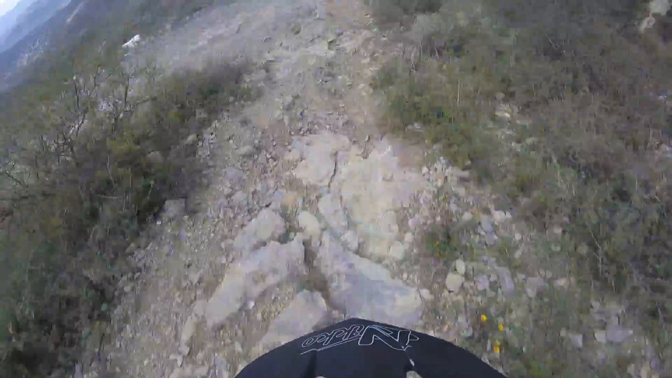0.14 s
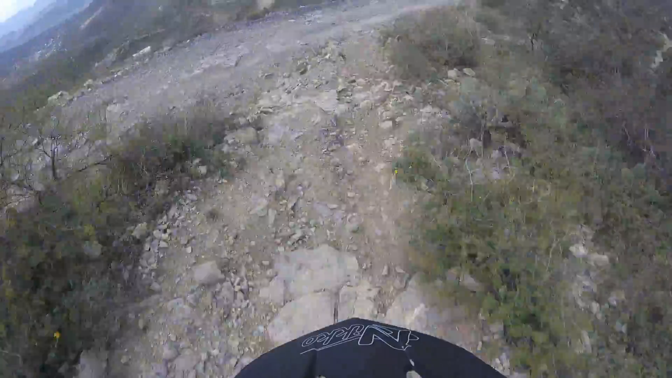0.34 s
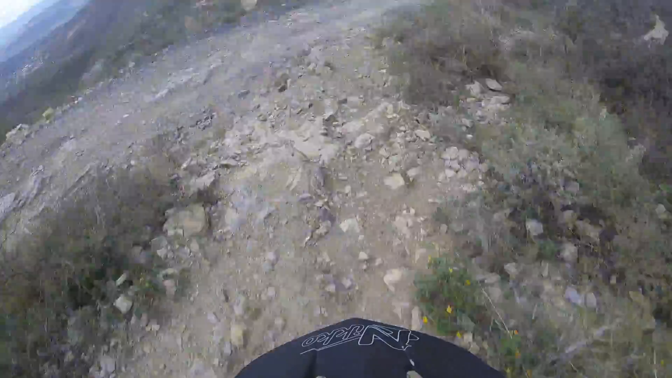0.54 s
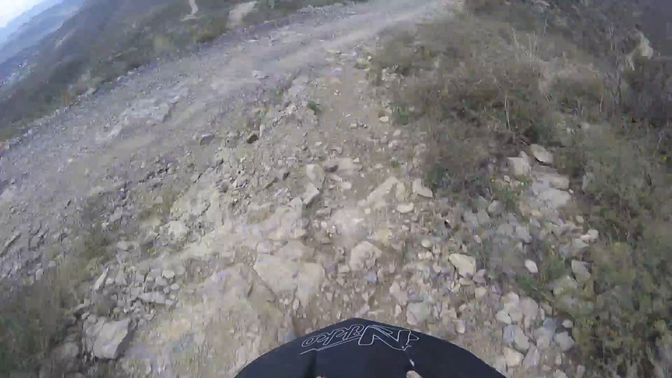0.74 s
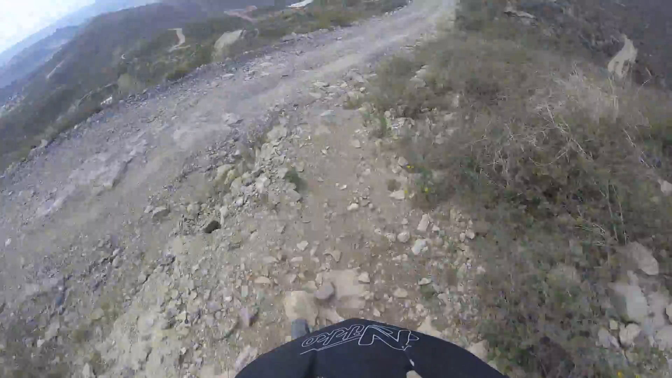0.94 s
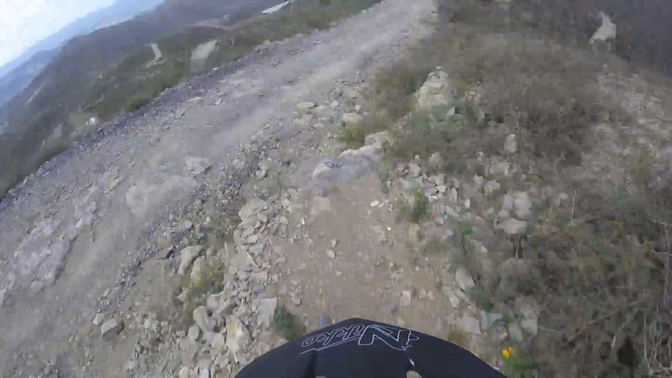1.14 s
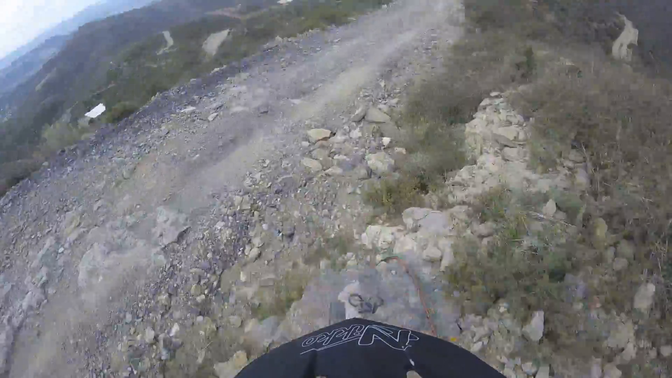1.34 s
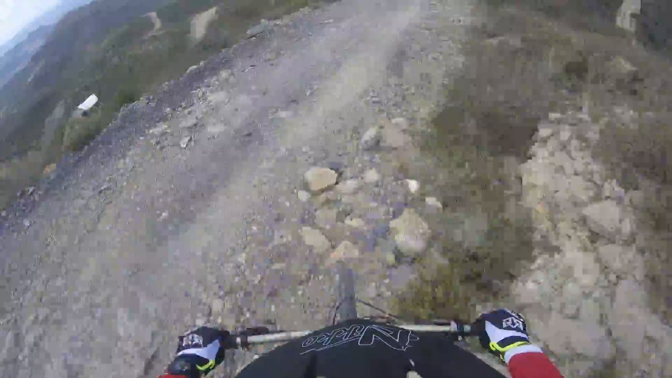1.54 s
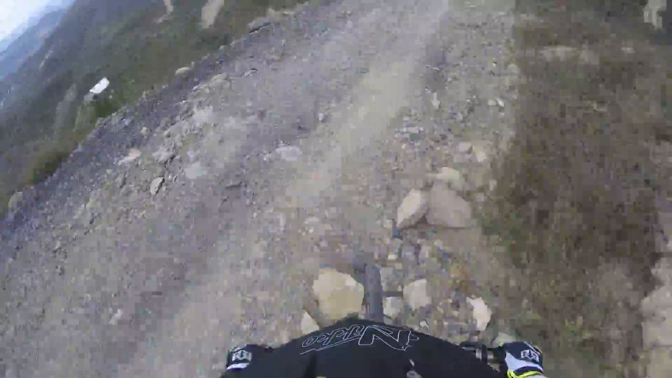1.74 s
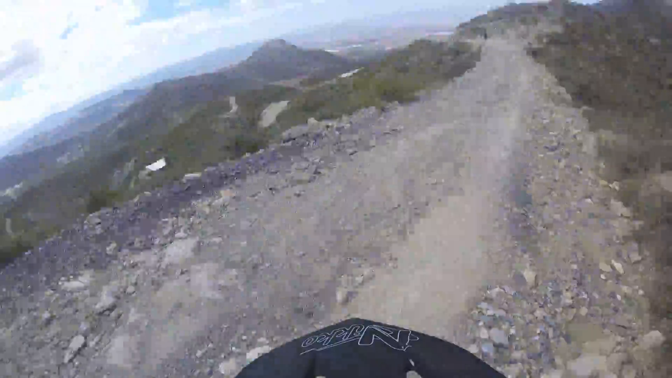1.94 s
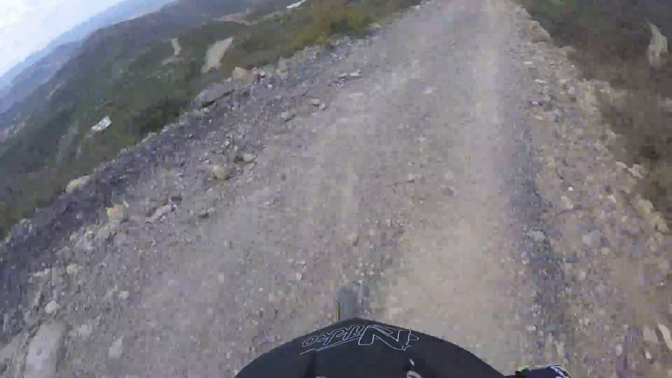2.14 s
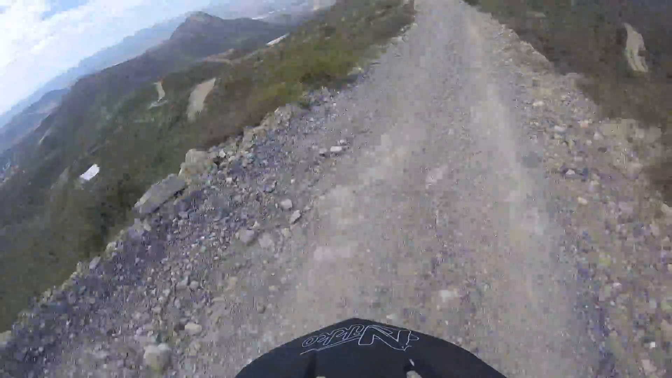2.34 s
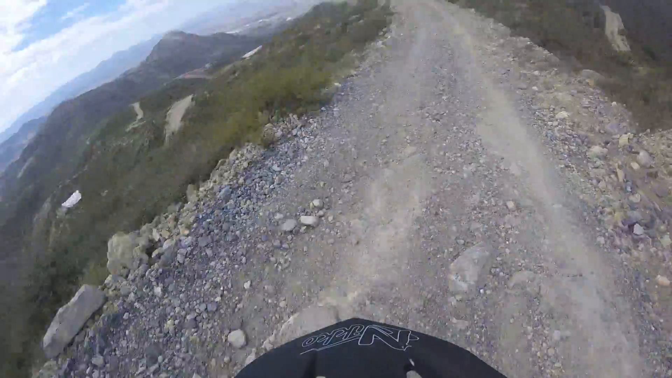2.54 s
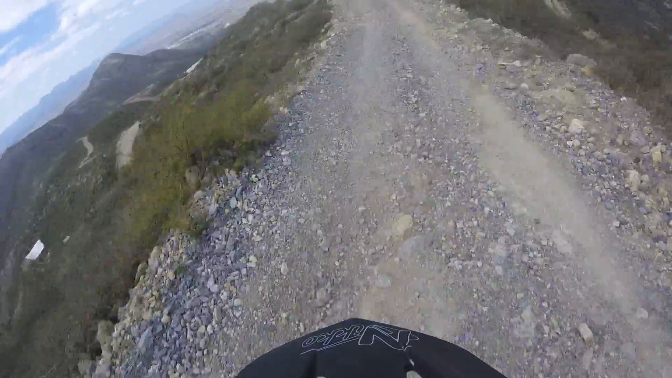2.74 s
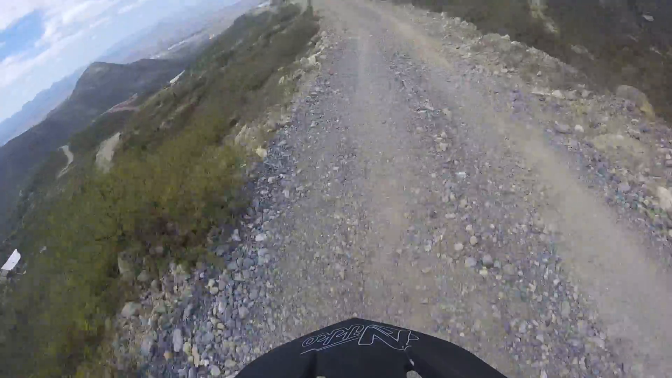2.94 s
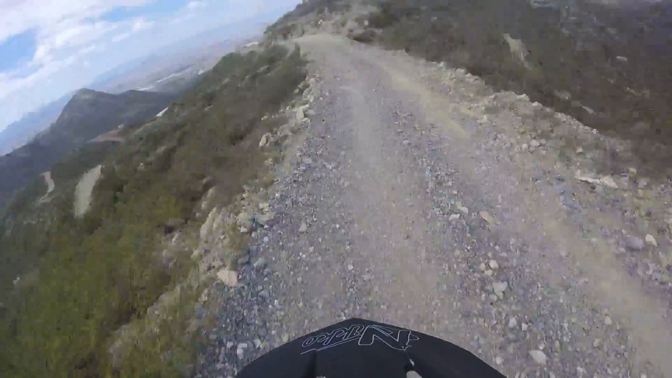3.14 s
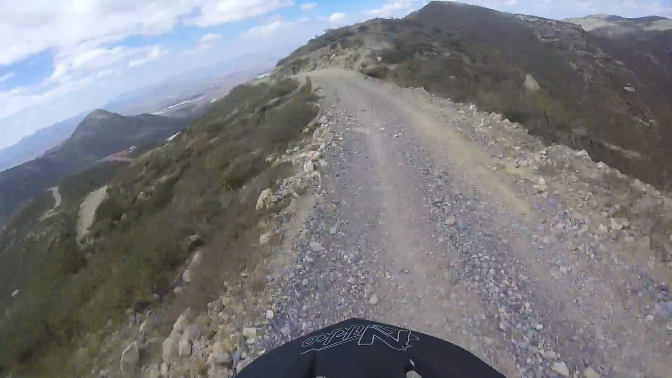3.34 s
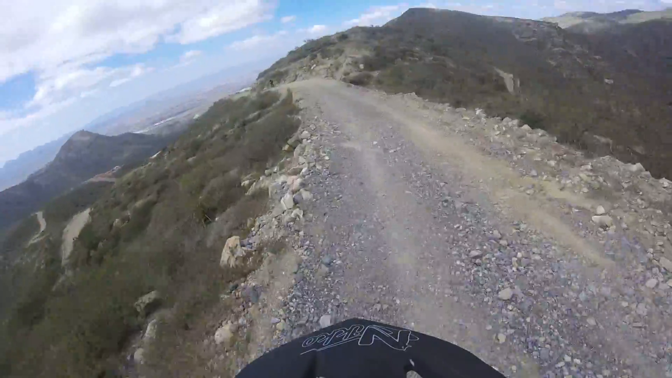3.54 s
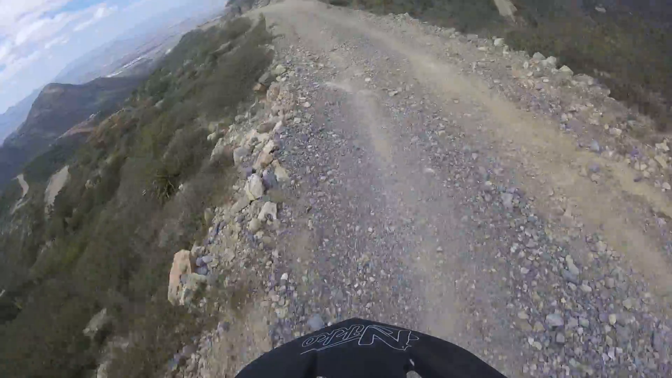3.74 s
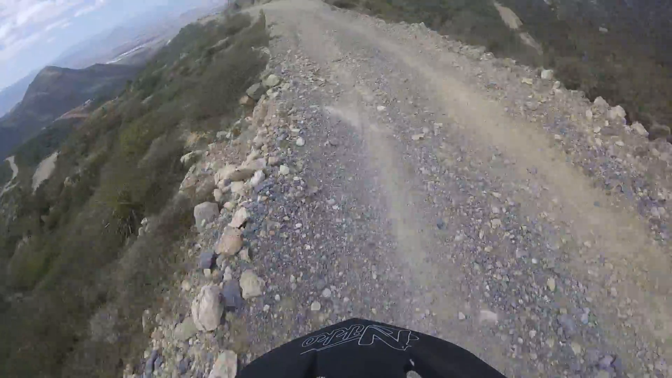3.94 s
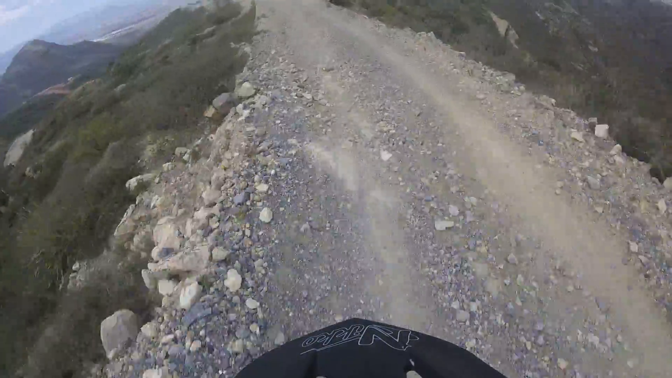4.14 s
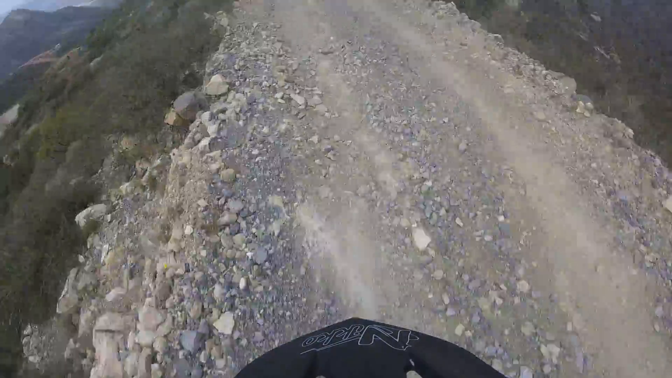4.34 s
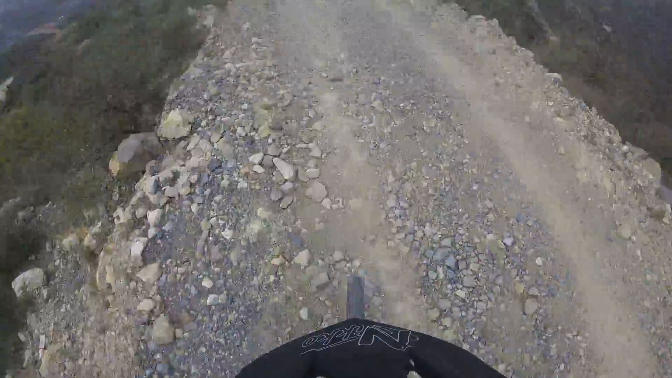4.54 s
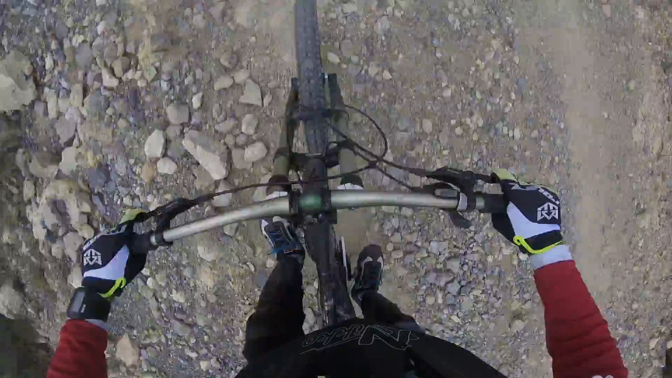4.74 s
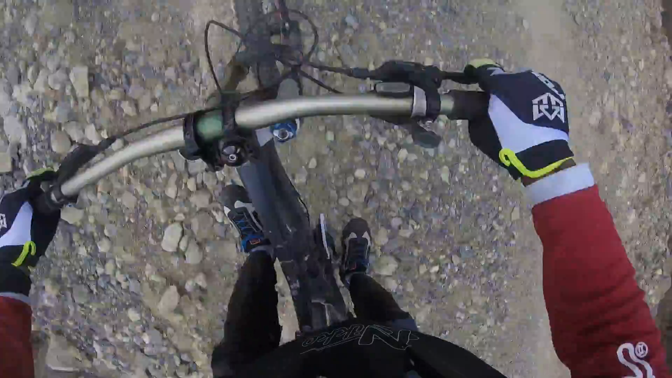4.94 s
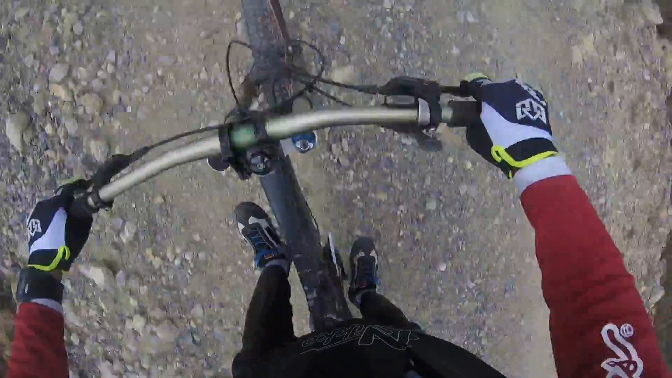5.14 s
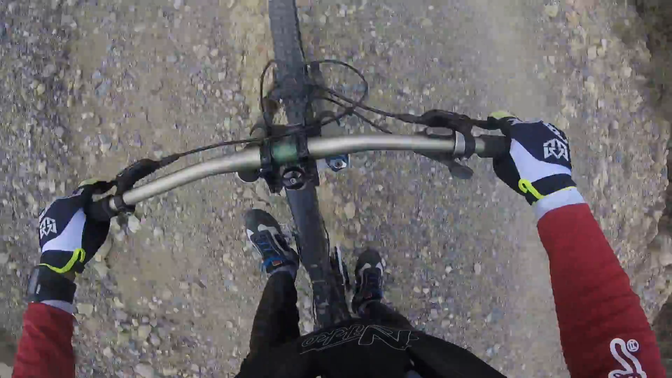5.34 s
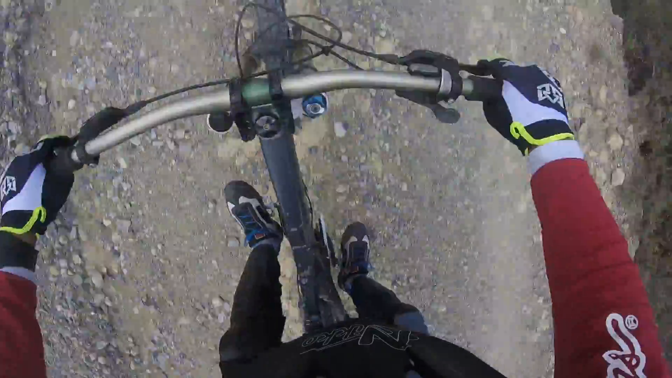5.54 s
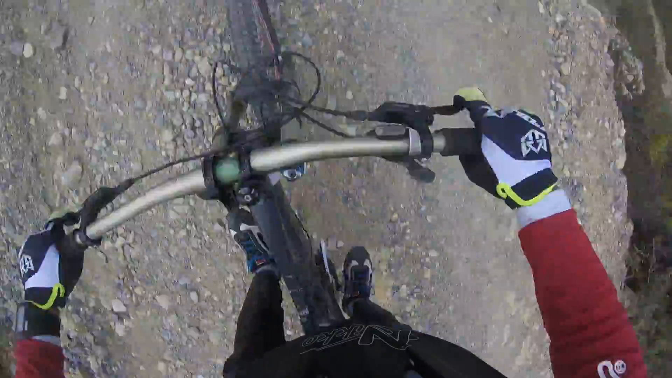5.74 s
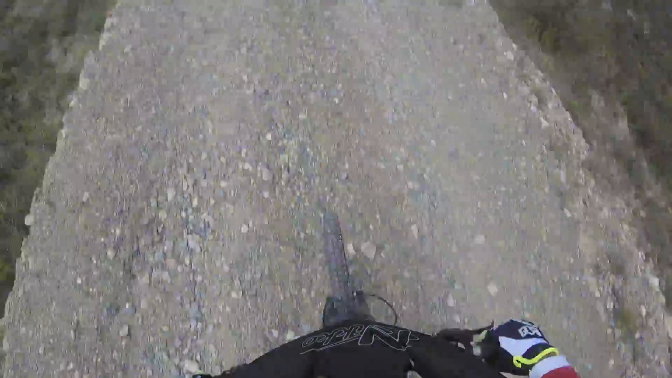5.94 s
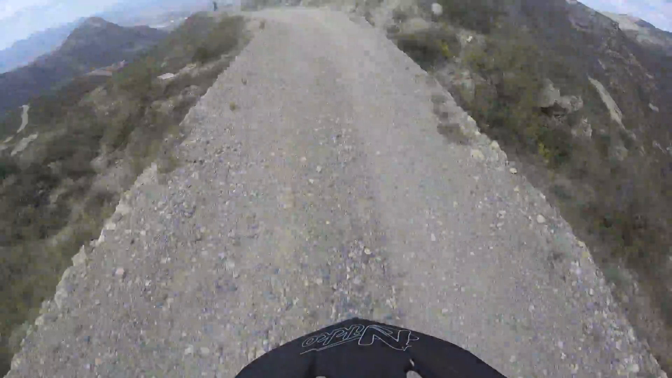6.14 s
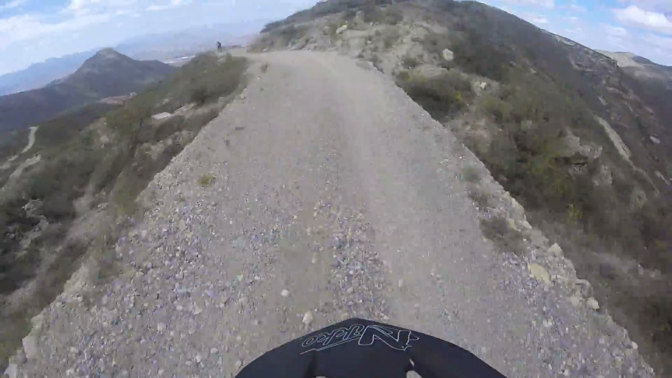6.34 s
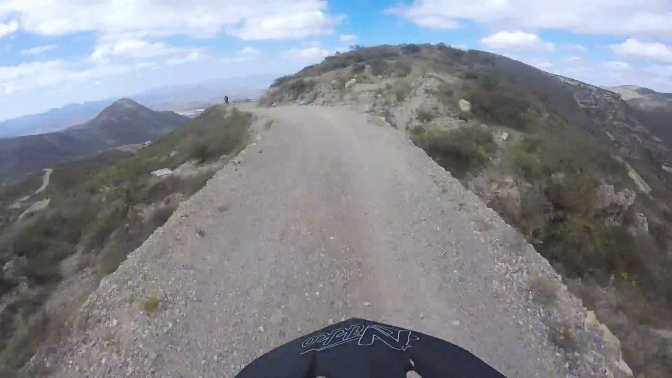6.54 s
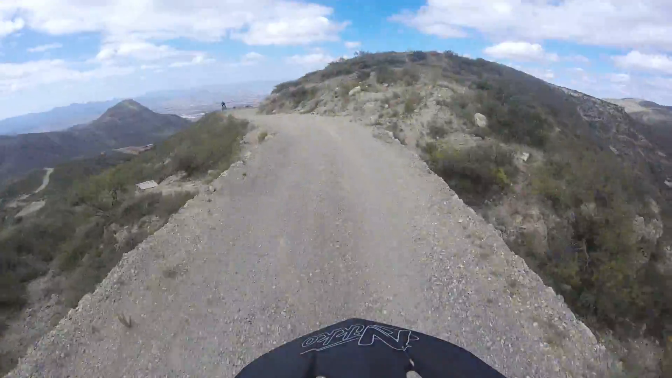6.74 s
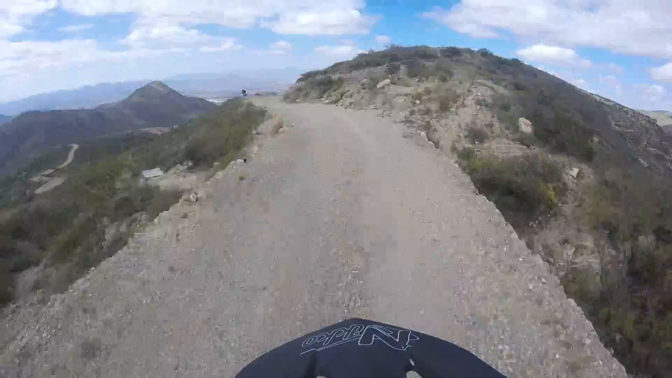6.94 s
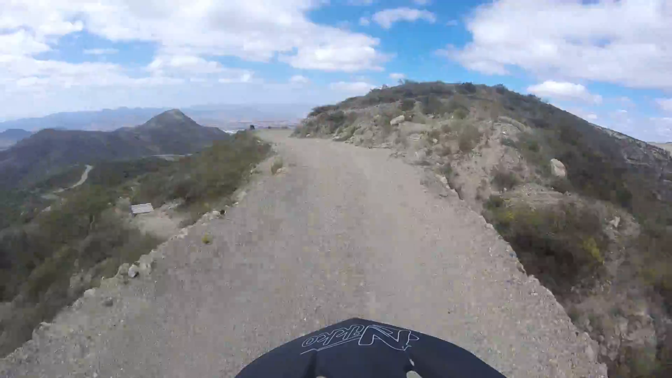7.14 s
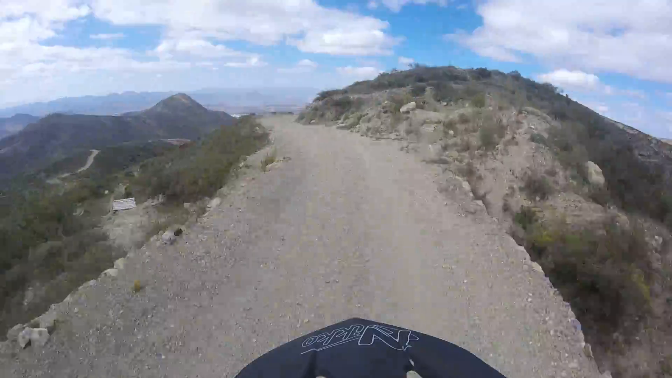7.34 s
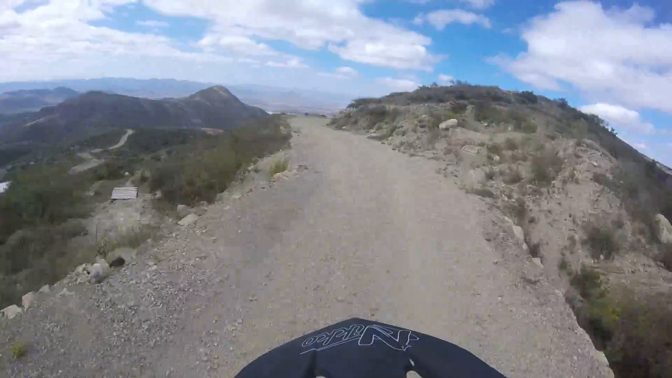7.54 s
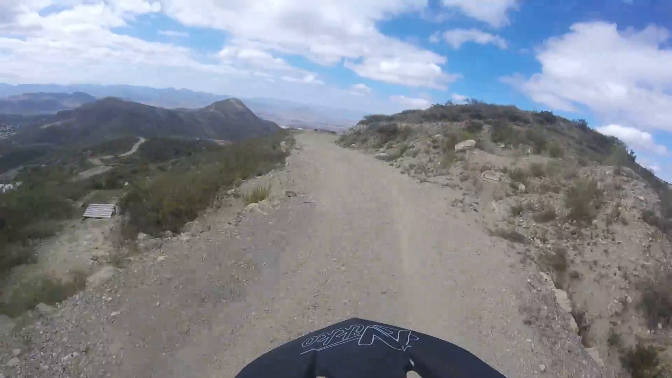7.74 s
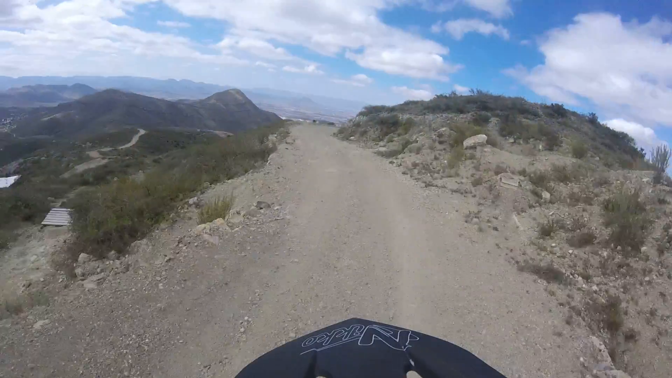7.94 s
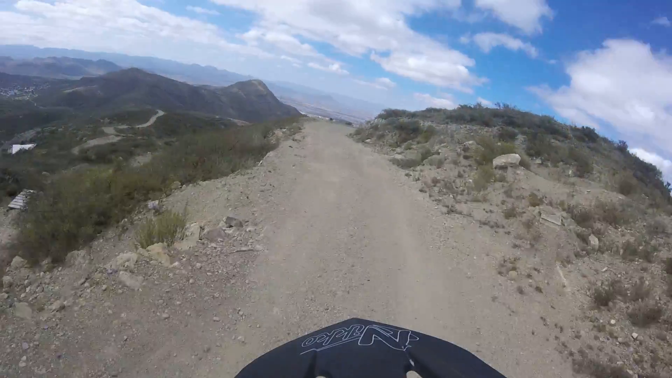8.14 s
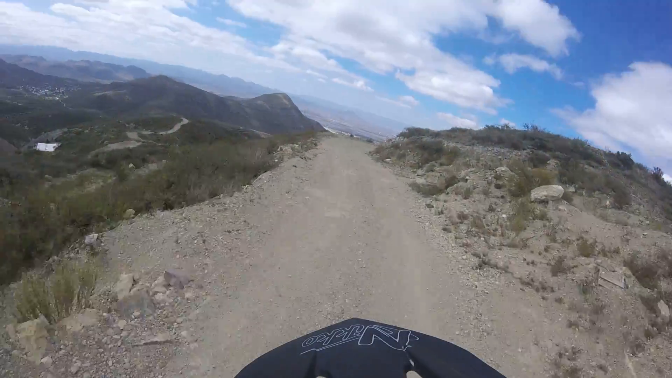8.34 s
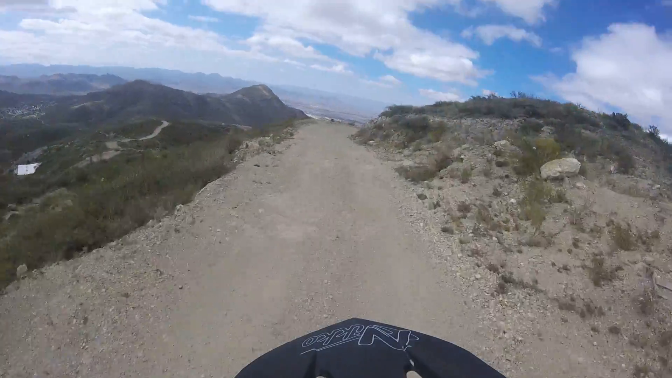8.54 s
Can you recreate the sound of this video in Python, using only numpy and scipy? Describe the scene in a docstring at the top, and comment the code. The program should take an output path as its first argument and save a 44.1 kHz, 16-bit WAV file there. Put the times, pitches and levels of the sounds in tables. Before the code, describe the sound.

A bicycle rolls down a gravel trail, tyres crunching and stones ticking, while wind buffets and thumps a muffled helmet-mounted microphone.

```python
"""Low wind buffeting and a mount hum near 100 Hz set in at once, with gravel crunching under bicycle tyres.
A mountain bike rolls down a gravel trail, heard by a small camera in a closed housing on the rider's helmet.
Buffeting, hum and air rush are filtered noise; jolts are slow pressure swings pushing the membrane;
loose parts knock and stones tick as noise bursts through resonances; dense random cracks make the crunch."""
import sys
import numpy as np
from scipy import signal
from scipy.fft import rfft, irfft, next_fast_len
from scipy.io import wavfile

SR = 44100
rng = np.random.default_rng(int(sys.argv[2]) if len(sys.argv) > 2 else 0)


def dump_mix(stems):
    """Bounce the given channels to the path in sys.argv[1] as a 16-bit WAV at rate SR."""
    frames = np.atleast_2d(stems).T  # one column per channel
    limited = np.clip(frames, -1, 1)  # hard clip at full scale
    pcm = np.round(limited * 32767).astype(np.int16)
    wavfile.write(sys.argv[1], SR, pcm)


N = 379701

# wind and mount, shaking at the helmet: [t/s, buffeting level/dB, hum level/dB]
AIR_LEVELS = [(0, -31, -37.5), (.5, -30, -45), (.9, -35, -39.5), (1.43, -33.5, -42), (1.9, -43.5, -41),
              (2.2, -24.5, -32.5), (2.4, -35, -44.5), (2.62, -39.5, -37.5), (3.24, -36.5, -43),
              (3.7, -41.5, -43), (4.2, -39.5, -40.5), (4.7, -42, -41), (5.2, -33, -41.5),
              (5.46, -40.5, -44), (6.2, -41.5, -45), (6.7, -38.5, -44), (7.4, -42, -48), (8.61, -43, -49)]
# wind buffeting spectrum: [f/Hz, level/dB]
BUFFET_SPECTRUM = [(8, 1), (20, 2.5), (35, 3.5), (60, -15.5), (100, -10.5), (200, -56.5), (1000, -120)]
# air rush spectrum: [f/Hz, level/dB]
RUSH_SPECTRUM = [(120, -8), (200, 0), (300, -3), (450, -10), (800, -12.5), (1200, -11.5), (3000, -15),
                 (6000, -44), (15000, -51)]
# helmet mount resonances: [f/Hz, width/Hz, level/dB]
MOUNT_MODES = [(96.8, 25.5, 1.5), (141.6, 25.5, -8.5), (231.3, 35, -14.5)]
# bumps of the chin bar: [t/s, level/dB]
MOUNT_BLOWS = [(0.186, -28), (2.619, -32), (4.726, -20.5)]
# broad part of a bump: [f/Hz, level/dB]
THUD_SPECTRUM = [(60, -35), (150, -23), (300, -23.5), (600, -49), (3000, -110)]
# head jolts that suck the membrane out: [t/s, level/dB, time scale/ms]
JOLTS = [(0.138, -16, 19), (0.177, -25, 6.8), (0.36, -15, 12.7), (0.488, -19.5, 33), (0.616, -18.5, 20),
         (0.727, -27, 9.1), (0.78, -7, 9), (0.881, -21.5, 27), (0.988, -13.5, 9.2), (1.042, -24, 7.9),
         (1.122, -19, 10.4), (1.195, -25.5, 13), (1.267, -16, 12), (1.45, -10, 11.8), (1.53, -23.5, 31),
         (1.748, -24.5, 54), (2.103, -7.5, 9.3), (2.186, -25, 31), (2.252, -20, 47), (2.558, -25.5, 14),
         (2.637, -21, 21), (3.151, -22, 27), (3.381, -25.5, 21), (3.965, -28.5, 22), (4.821, -18.5, 17),
         (4.991, -22.5, 52), (5.124, -24, 29), (5.233, -26, 18), (5.307, -19.5, 35), (5.691, -22.5, 34),
         (5.806, -23.5, 21), (6.768, -28, 14)]
# knocks of loose parts: [t/s, level/dB, f/Hz]
KNOCKS = [(0.089, -36, 2500), (0.2853, -39, 2670), (0.314, -37, 2570), (0.4492, -36.5, 2540),
          (0.5962, -32, 1500), (0.7597, -30, 2560), (1.0016, -32.5, 1930), (1.0989, -41, 1510),
          (1.422, -31.5, 3930), (2.7874, -35, 2720), (2.9, -31, 1520), (4.8234, -40, 1920),
          (4.889, -29, 2160), (4.9223, -31, 1630), (4.9503, -37, 2630), (4.9765, -36, 1600),
          (5.032, -34.5, 2510), (5.07, -36, 2070), (5.0998, -38, 1600), (5.1362, -36, 2900),
          (5.1632, -39, 2620), (5.2017, -36, 3730), (5.2427, -34, 2220), (5.2946, -37, 2600),
          (5.317, -31.5, 2500), (5.365, -38.5, 2130), (5.5174, -34, 2050), (5.5594, -36.5, 3820),
          (5.5992, -38.5, 2630), (5.6445, -35, 2770), (5.697, -36.5, 2240), (5.7578, -36.5, 2650),
          (5.7999, -32.5, 3600), (5.8069, -35.5, 2510), (5.846, -38, 2680), (5.92, -40, 2660)]
# stones against rim and frame: [t/s, level/dB]
TICKS = [(0.102, -51), (0.124, -55), (0.159, -43), (0.2204, -52), (0.321, -45.5), (0.4525, -39),
         (0.5933, -43), (0.7562, -46), (0.9048, -56), (0.951, -51), (1.002, -46.5), (1.1025, -51.5),
         (1.223, -51.5), (1.421, -43), (1.517, -52.5), (1.596, -46.5), (2.029, -46), (2.0757, -45),
         (2.1335, -37), (2.183, -43), (2.377, -55), (2.4109, -57), (2.4518, -58), (2.9073, -50),
         (3.7359, -49), (3.8407, -46), (4.301, -50), (4.4922, -49.5), (4.841, -59), (4.8838, -46),
         (4.8946, -46), (4.9086, -42.5), (4.9856, -42.5), (5.034, -48), (5.0693, -50), (5.107, -48),
         (5.125, -50), (5.1444, -49), (5.238, -50.5), (5.294, -55), (5.3118, -38), (5.36, -53),
         (5.387, -42.5), (5.447, -41.5), (5.524, -59), (5.698, -54), (5.748, -47), (5.8885, -54),
         (5.9304, -58), (6.7207, -47), (7.0589, -60)]
# resonances excited by ticks: [f/Hz, width/Hz, level/dB]
TICK_MODES = [(3600, 960, 11.5), (6205, 930, 7), (7750, 1900, 0.5), (8740, 380, -11), (11600, 710, -23),
              (13600, 1500, -30)]
# rocky stretches, small stones and parts chatter: [start t/s, end t/s, level/dB]
ROCKY_STRETCHES = [(0.0, 0.213, -60), (0.49, 1.65, -64), (2.0, 2.478, -62.5), (2.88, 3.22, -63),
                   (4.28, 4.36, -56), (4.71, 5.497, -62.5), (5.502, 6.05, -65)]
# chatter spectrum beside the tick modes: [f/Hz, level/dB]
CHATTER_SPECTRUM = [(2000, -24), (4500, 3), (7000, -11), (10000, -9), (15000, -34)]
# tyre crunch on gravel: [t/s, level/dB]
CRUNCH_LEVELS = [(0.0, -43), (0.08, -54), (0.16, -44), (0.25, -56.5), (0.46, -49.5), (0.58, -45),
                 (0.8, -42), (1.1, -44), (1.2, -51), (1.28, -46), (1.48, -43.5), (1.62, -51), (1.77, -39.5),
                 (1.94, -43), (2.08, -29.5), (2.17, -32.5), (2.28, -44), (2.48, -46.5), (2.63, -39),
                 (2.81, -50), (3.03, -38), (3.2, -45.5), (3.25, -51.5), (3.44, -41), (3.76, -33),
                 (3.85, -41.5), (3.89, -46.5), (4.0, -42), (4.24, -48), (4.33, -43.5), (4.42, -50.5),
                 (4.48, -59.5), (4.62, -50.5), (4.74, -52.5), (4.95, -48.5), (5.7, -56.5), (5.95, -54),
                 (6.24, -63.5), (6.4, -54.5), (6.6, -50.5), (6.72, -39), (7.03, -41.5), (7.18, -46),
                 (7.32, -43), (7.44, -48), (7.6, -43), (8.0, -47), (8.61, -45.5)]
# housing resonances, facing ahead: [f/Hz, width/Hz, level/dB]
HOUSING_AHEAD = [(1955, 340, 0), (2640, 390, 4), (2930, 490, -2.5), (3467, 1120, -4.5), (3560, 240, -7.5)]
# housing resonances, facing the front wheel: [f/Hz, width/Hz, level/dB]
HOUSING_DOWN = [(1690, 290, -6.5), (2070, 180, -3.5), (2600, 160, -1.5), (3000, 230, -14.5),
                (3703, 330, -5.5)]
# housing shut-off above its top resonance: [f/Hz, level/dB]
HOUSING_EDGE = [(3880, 0), (4150, -12)]
# transmission through the housing wall: [f/Hz, level/dB]
WALL_SPECTRUM = [(300, -21), (900, -24.5), (1700, -15), (2300, -5.5), (3900, -17.5), (4150, -25),
                 (4500, -27.5), (5200, -36.5), (7000, -45), (15000, -84)]
# helmet cavity resonances: [f/Hz, width/Hz, level/dB]
CAVITY_MODES = [(1425, 180, 5), (1552, 87, 3), (1216, 290, -20)]
# helmet cavity ring relative to the crunch: [t/s, level/dB]
CAVITY_LEVELS = [(0, 4), (.25, -1.5), (.55, -4), (1.3, 3.5), (1.63, -2), (1.8, 2), (2.2, -2.5), (3.1, 4.5),
                 (3.67, 0), (4.35, 5.5), (4.85, -4.5), (6.28, -2), (6.38, 6.5), (6.7, 3), (8.61, 1.5)]
# microphone port resonances, bright grit: [f/Hz, width/Hz, level/dB]
PORT_MODES = [(6176, 510, 8.5), (7440, 2300, -11.5)]

RUSH_DB, RUSH_PER_HUM, RUSH_PER_CRUNCH = -51.5, 0.38, 0.16  # level at mean hum and crunch; dB per dB of swing
SMOOTH_CHATTER_DB, ROCKY_EDGE_S = -72.5, 0.083
LOOK_DOWN_S, NOD_DOWN_S, LOOK_UP_S, NOD_UP_S = 4.4, 0.28, 5.95, 0.87  # head bows, for; lifts, for
GRIT_DB, GRIT_DOWN_DB = -21, 0  # relative to the crunch; change with the head bowed
OPEN_TOP_DB, OPEN_TOP_HZ = 10.5, 8500  # bowed head: boost of tick modes above this
LOWPASS_HZ = 14950
BURST_LEN = 2640  # samples, 60 ms

T_S = np.arange(N) / SR
SIZE = next_fast_len(N + SR // 2)
HZ = np.maximum(np.arange(SIZE // 2 + 1) * SR / SIZE, 1)


def amp(db):
    """dB to gain."""
    return 10 ** (np.asarray(db) / 20)


def rms_one(x):
    """Scale to rms 1."""
    return x / np.sqrt(np.mean(x ** 2) + 1e-20)


def in_time(rows):
    """Interpolate the columns of a time table at every sample."""
    s, *columns = np.transpose(rows)
    return [np.interp(T_S, s, column) for column in columns]


def slope(points):
    """Power response through (f/Hz, level/dB) points, linear in log f."""
    hz, db = np.transpose(points)
    return amp(np.interp(np.log(HZ), np.log(hz), db)) ** 2


def peaks(modes, order=2):
    """Power response of parallel resonances; higher order gives steeper skirts."""
    total = 0
    for hz, width_hz, db in modes:
        detuning = 2 * (HZ - hz) / width_hz
        total = total + amp(db) ** 2 / (1 + detuning ** 2) ** order
    return total


def colour(x, power):
    """Minimum-phase filter with this power response, by folding the cepstrum."""
    cepstrum = irfft(.5 * np.log(power + 1e-14), SIZE)
    cepstrum[1:SIZE // 2] *= 2
    cepstrum[SIZE // 2 + 1:] = 0
    response = np.exp(rfft(cepstrum))
    return irfft(rfft(x, SIZE) * response, SIZE)[:len(x)]


def drift(corner_hz):
    """Slow random curve, spread 1: noise through a double pole at 1/40 of the sample rate."""
    r = np.exp(-2 * np.pi * corner_hz * 40 / SR)
    noise = rng.standard_normal(N // 40 + 2002)
    slow = signal.lfilter([1], [1, -2 * r, r * r], noise)[2000:]  # drop the settling
    return np.interp(np.arange(N) / 40, np.arange(len(slow)), rms_one(slow))


def grains(per_s, uneven_db):
    """Random clicks of uneven size and either sign, rms 1."""
    size_db = uneven_db * np.minimum(rng.exponential(1, N), 5)
    sizes = amp(size_db) * rng.choice([-1, 1], N)
    return rms_one(sizes * (rng.random(N) < per_s / SR))


def burst(decay_ms, bounce_db, rise_ms):
    """Contact with bounces: noise in 2 ms clumps, fast rise, decay with a weak 18 ms tail, rms 1."""
    t_s = np.arange(BURST_LEN) / SR
    clumps = amp(bounce_db * np.repeat(rng.standard_normal(30), 88))
    rise = 1 - np.exp(-1000 * t_s / rise_ms)
    decay = np.exp(-1000 * t_s / decay_ms) + 0.16 * np.exp(-t_s / 0.018)
    return rms_one(rng.standard_normal(BURST_LEN) * clumps * rise * decay)


def looking_down():
    """Head position: 0 facing ahead, 1 facing the front wheel, linear between."""
    bowing = (T_S - LOOK_DOWN_S) / NOD_DOWN_S
    lifting = 1 - (T_S - LOOK_UP_S) / NOD_UP_S
    return np.clip(np.minimum(bowing, lifting), 0, 1)


def housing(modes):
    """Power response of the closed housing: its resonances plus what passes the wall."""
    return peaks(modes, order=3) * slope(HOUSING_EDGE) + slope(WALL_SPECTRUM)


def air_rush():
    """Rush of air: broad noise whose level partly follows the hum and the crunch."""
    _, hum_db = in_time(AIR_LEVELS)
    crunch_db, = in_time(CRUNCH_LEVELS)
    hum_swing_db, crunch_swing_db = hum_db - hum_db.mean(), crunch_db - crunch_db.mean()
    rush_db = RUSH_DB + RUSH_PER_HUM * hum_swing_db + RUSH_PER_CRUNCH * crunch_swing_db
    noise = rms_one(colour(rng.standard_normal(N), slope(RUSH_SPECTRUM)))
    return amp(rush_db + 2.07 * drift(19.0)) * noise


def buffeting():
    """Wind pressure at the microphone: lumpy low-frequency noise."""
    buffet_db, _ = in_time(AIR_LEVELS)
    noise = rms_one(colour(rng.standard_normal(N), slope(BUFFET_SPECTRUM)))
    return amp(buffet_db + 3.0 * drift(6)) * noise


def mount_hum():
    """Shaken helmet mount: noise through its resonances, wavering in level."""
    _, hum_db = in_time(AIR_LEVELS)
    noise = rms_one(colour(rng.standard_normal(N), peaks(MOUNT_MODES)))
    return amp(hum_db + 1.6 * drift(6.2)) * noise


def mount_blows():
    """Chin bar bumps: impulses ring the mount and a broad thud."""
    blows = np.zeros(N)
    for s, db in MOUNT_BLOWS:
        blows[round(s * SR)] = amp(db + 53.5)
    return colour(blows, peaks(MOUNT_MODES) + slope(THUD_SPECTRUM))


def jolts(rebound=0.79, settle_s=0.017, leak_hz=3.7):
    """Suction builds up, snaps over into pressure and settles; the housing leaks the slowest part away."""
    out, t_s = np.zeros(N), np.arange(-4000, 6000) / SR
    for s, db, ms in JOLTS:
        u = 1000 * t_s / ms
        snap = .5 + .5 * np.tanh((u - .45) / .22)
        suction = np.exp(-.5 * (np.minimum(u, 0) / .6) ** 2)
        pressure = rebound * np.exp(-np.abs(t_s) / settle_s)
        push = snap * pressure - (1 - snap) * suction
        out[round(s * SR) - 4000:][:10000] += amp(db) * push
    leak = signal.butter(1, leak_hz, "high", fs=SR, output="sos")
    return signal.sosfilt(leak, out)


def knocks():
    """Loose parts: dull bursts, each with its own resonance, through the facing-down housing and the cavity."""
    out = np.zeros(N + BURST_LEN)
    for s, db, hz in KNOCKS:
        b, a = signal.iirpeak(hz, 1.1, fs=SR)
        contact = burst(6.3, bounce_db=1.0, rise_ms=2.2)
        out[round(s * SR):][:BURST_LEN] += amp(db + 4.0) * signal.lfilter(b, a, contact)
    return colour(out[:N], housing(HOUSING_DOWN) + amp(-17.5) * peaks(CAVITY_MODES))


def chatter():
    """Small stones and parts: noise under decaying random grains, faint on smooth ground, up on rocky."""
    gain = amp(SMOOTH_CHATTER_DB)
    for start_s, end_s, db in ROCKY_STRETCHES:
        begun = .5 + .5 * np.tanh((T_S - start_s) / ROCKY_EDGE_S)
        ended = .5 + .5 * np.tanh((T_S - end_s) / ROCKY_EDGE_S)
        gain = gain + amp(db) * (begun - ended)
    small = np.abs(grains(120, uneven_db=3.5)) + 0.055
    envelope = signal.lfilter([1], [1, -.99], small)
    noise = rms_one(envelope * rng.standard_normal(N))
    return colour(gain * noise, peaks(TICK_MODES) + slope(CHATTER_SPECTRUM))


def ticks():
    """Stones on rim and frame: bright bursts, each exciting the modes with strengths of its own."""
    tick_s, tick_db = np.transpose(TICKS)
    bursts = [burst(9.4, bounce_db=4.0, rise_ms=0.86) for _ in TICKS]
    bowed = looking_down()[(tick_s * SR).astype(int)]
    out = np.zeros(N)
    for mode in TICK_MODES:
        spread_db = 2.5 * rng.standard_normal(len(TICKS))
        top_db = OPEN_TOP_DB * bowed * (mode[0] > OPEN_TOP_HZ)
        gains = amp(tick_db - 8.5 + spread_db + top_db)
        struck = np.zeros(N + BURST_LEN)
        for s, gain, contact in zip(tick_s, gains, bursts):
            struck[round(s * SR):][:BURST_LEN] += gain * contact
        out += colour(struck[:N], peaks([mode]))
    return out


def tyres():
    """Dense gravel cracks, in clumps, reach the microphone by housing, helmet cavity and port."""
    down = looking_down()
    crunch_db, = in_time(CRUNCH_LEVELS)
    cavity_db, = in_time(CAVITY_LEVELS)
    gravel = amp(crunch_db + 1.04 * drift(7.5)) * grains(5000.0, uneven_db=2.5)
    paths = [(housing(HOUSING_AHEAD), amp(1.0) * np.sqrt(1 - down)),
             (housing(HOUSING_DOWN), np.sqrt(down)),
             (peaks(CAVITY_MODES), amp(cavity_db)),
             (peaks(PORT_MODES), amp(GRIT_DB + GRIT_DOWN_DB * down))]
    out = np.zeros(N)
    for power, gain in paths:
        waver = amp(0.74 * drift(25.0))
        out += gain * waver * colour(gravel, power / np.mean(power))  # unit mean power per path
    return out


def scene():
    """All sources at the one microphone."""
    air = air_rush() + buffeting() + mount_hum() + mount_blows()
    return (air + jolts() + knocks() + chatter() + ticks() + tyres())[None]


def record(dry):
    """Add faint low-tilted self-noise, cut the top with a steep lowpass."""
    hiss = amp(-74.0) * signal.lfilter([1, .45], [1, -.7], rng.standard_normal(dry.shape))
    lowpass = signal.ellip(10, .5, 60, LOWPASS_HZ, fs=SR, output="sos")
    return signal.sosfilt(lowpass, dry + hiss)


dry = scene()
out = record(dry)
dump_mix(out)
```